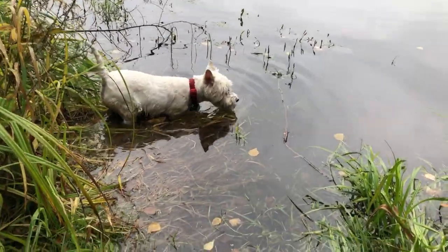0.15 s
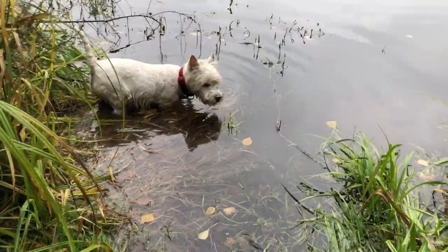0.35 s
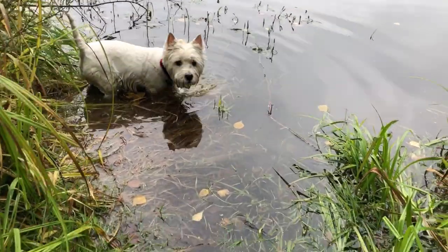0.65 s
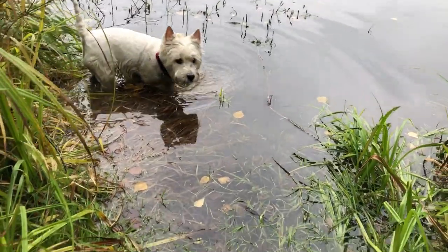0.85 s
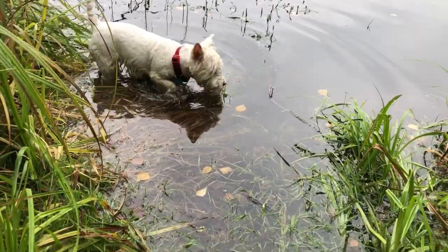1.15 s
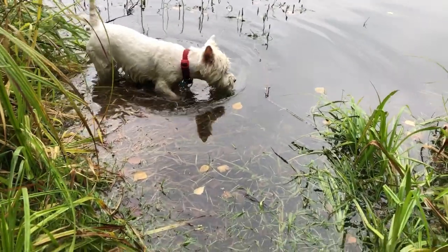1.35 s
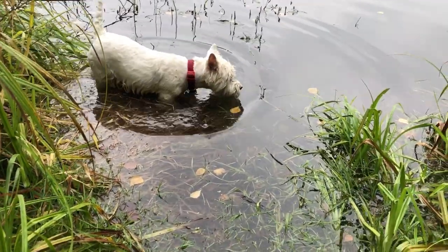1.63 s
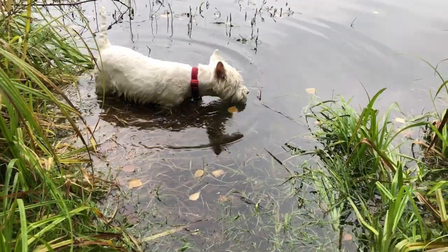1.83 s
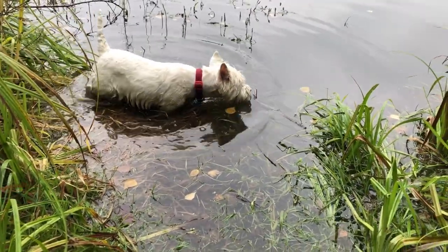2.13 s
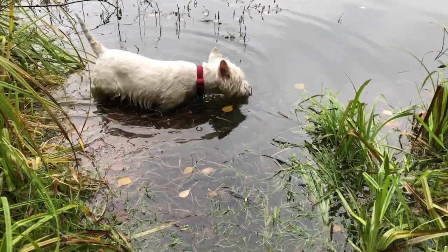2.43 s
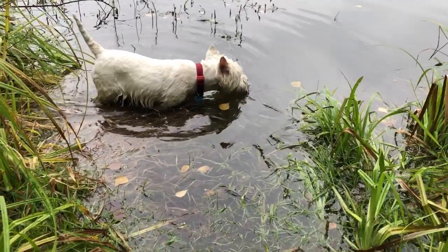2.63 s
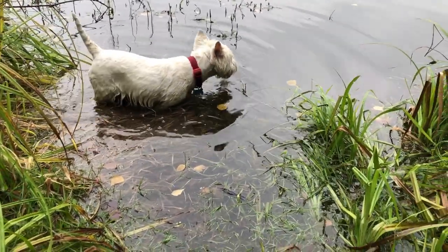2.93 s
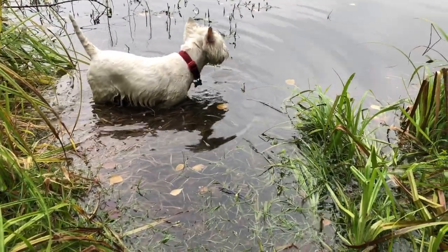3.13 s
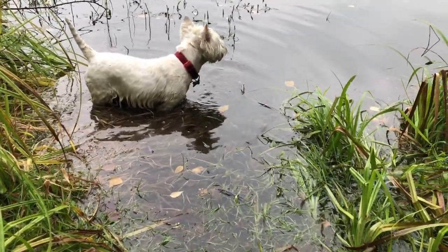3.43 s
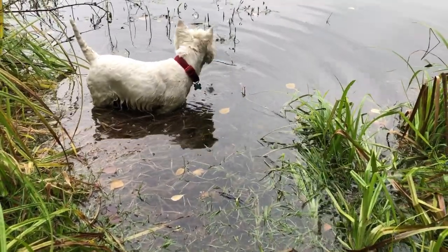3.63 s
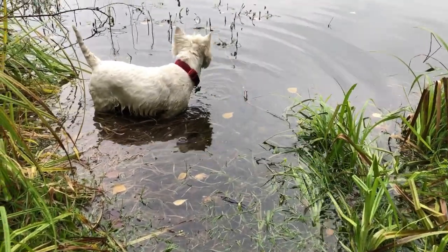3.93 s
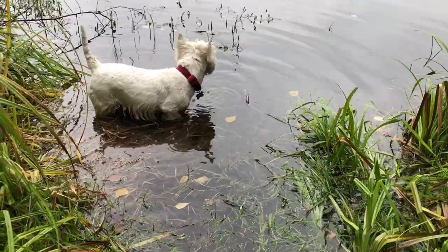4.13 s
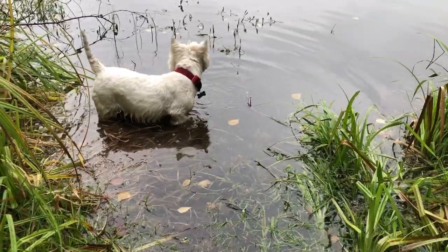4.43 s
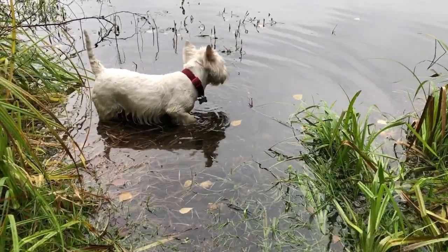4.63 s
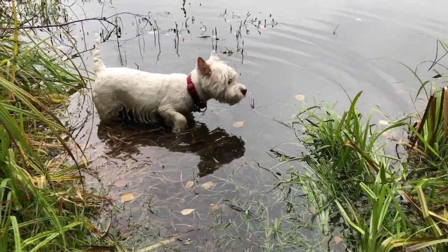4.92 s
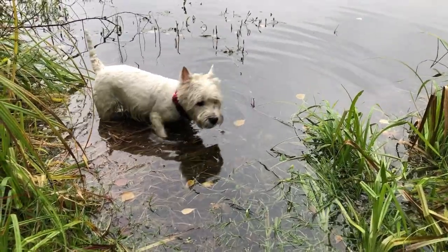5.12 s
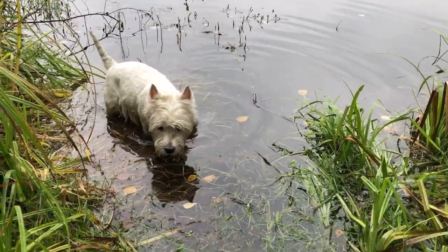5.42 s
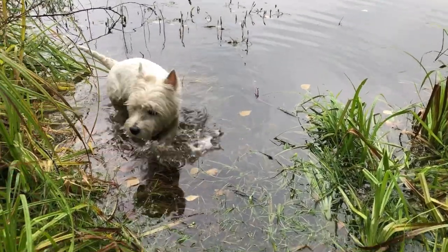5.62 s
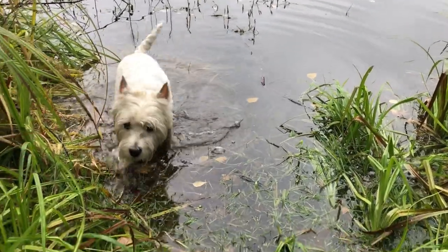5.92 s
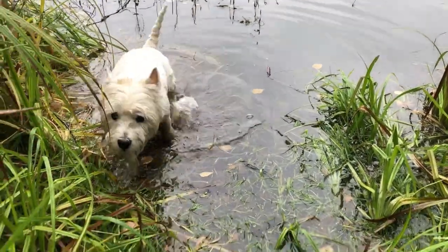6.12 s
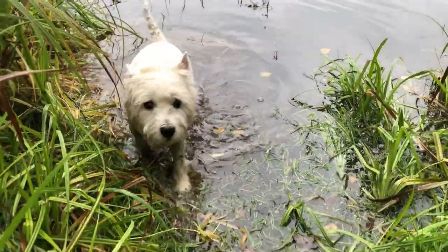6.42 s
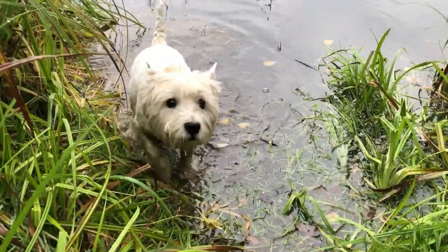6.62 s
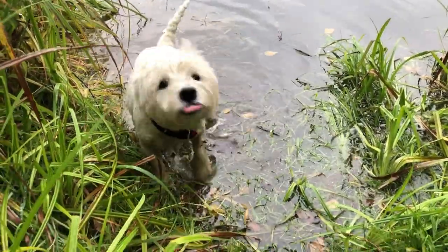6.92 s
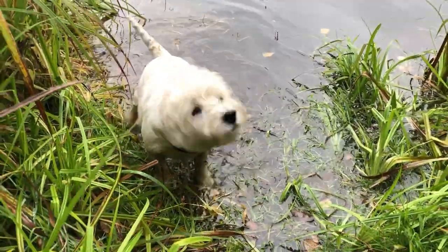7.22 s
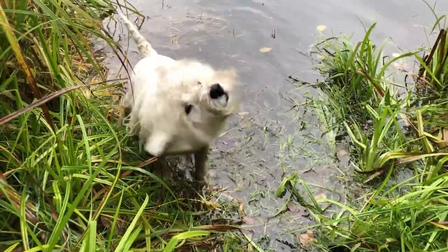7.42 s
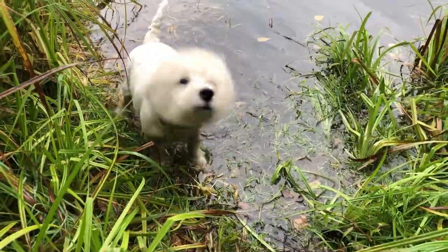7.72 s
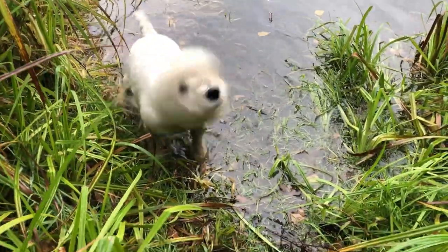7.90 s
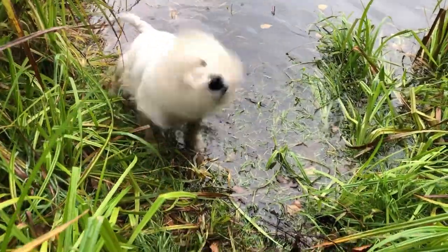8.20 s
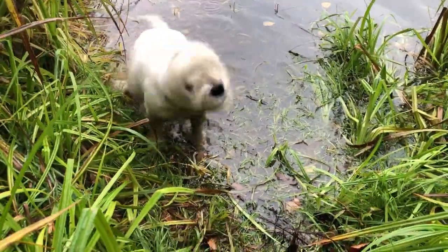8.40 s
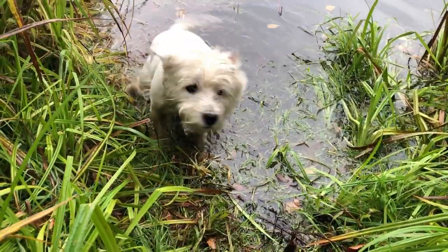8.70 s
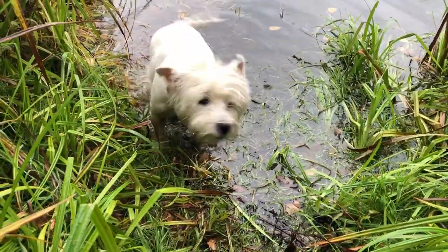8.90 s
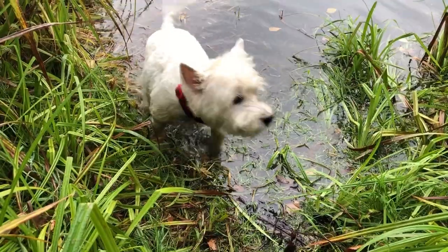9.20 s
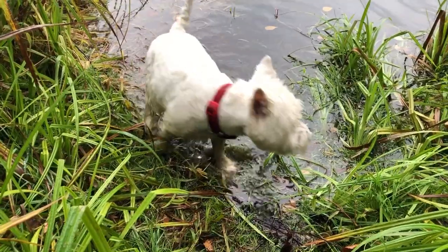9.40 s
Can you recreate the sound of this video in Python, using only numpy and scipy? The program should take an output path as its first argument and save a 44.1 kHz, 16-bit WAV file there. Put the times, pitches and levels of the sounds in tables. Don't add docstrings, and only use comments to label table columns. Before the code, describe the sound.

A small dog wades gently through shallow water with gulps and ticking drops, splashes to the bank, then shakes with jingling collar and pattering spray.

```python
import sys
import numpy as np
from scipy import signal
from scipy.fft import rfft, irfft, next_fast_len
from scipy.io import wavfile
from scipy.ndimage import uniform_filter1d, map_coordinates

SR = 44100
rng = np.random.default_rng(int(sys.argv[2]) if len(sys.argv) > 2 else 0)


def master_out(mix):
    frames = np.transpose(np.atleast_2d(mix))
    ceiling = np.clip(frames, -1, 1)
    pcm = np.round(ceiling * 32767).astype(np.int16)
    wavfile.write(sys.argv[1], SR, pcm)


def volts_from_decibels(level):
    exponent = np.asarray(level, float) / 20
    return 10 ** exponent


N = 421155

# (time [s], chatter level [dB])
SHAKE = [
    (7.101, -66),
    (7.9, -66),
    (8.5, -60),
    (9.15, -63),
]
# (pitch [Hz], time to fall 60 dB [s])
TAG_MODES = [(11865, 0.058), (10350, 0.093), (15300, 0.097)]


def unit(x):
    return x / np.sqrt(np.mean(x ** 2) + 1e-20)


def coloured(x, spectrum):
    size = next_fast_len(x.shape[-1] + 2048)
    hz, db = np.transpose(spectrum)
    gain = volts_from_decibels(np.interp(np.log(np.fft.rfftfreq(size, 1 / SR) + 1), np.log(hz), db))
    return irfft(rfft(x, size) * gain, size)[..., :x.shape[-1]]


def wobble(rate):
    points = rng.standard_normal(int(N * rate / SR) + 4)
    return map_coordinates(points, [np.arange(N) * rate / SR])


def placed(start_s, waves):
    at = np.round(start_s * SR).astype(int)[:, None] + np.arange(waves.shape[1])
    return np.bincount(at.ravel(), waves.ravel(), N + SR)[:N]


def chirps(start_s, db, hz, life, glide, size, rise=0.16):
    age = np.arange(size) / SR / life[:, None]
    swell = (1 - np.exp(-age / rise)) * np.exp(-1.6 * age) * (age < 3)
    pitch = hz[:, None] * np.exp(glide[:, None] * np.minimum(age, 1.25))
    tone = np.sin(2 * np.pi * np.cumsum(pitch, axis=1) / SR)
    return placed(start_s, volts_from_decibels(db)[:, None] * swell * tone)


def swarm(count, hz, spread, cycles, scatter_db, size):
    pitch = np.clip(hz * np.exp(spread * rng.standard_normal(count)), 200, 15500)
    db = scatter_db * np.minimum(rng.exponential(size=count), 4)
    start_s = rng.uniform(0, N / SR, count)
    glide = rng.normal(0.12, 0.161, count)
    return unit(chirps(start_s, db, pitch, cycles / pitch, glide, size))


def stirring():
    # (time [s], time to fall 20 dB [s], slosh level [dB], depth as gurgle over slosh [dB])
    strokes = [(0.01, 2.5, -68.5, -13), (1.13, .25, -65, 9.5), (1.24, 0, -69, 12), (1.68, 0.2, -57, 6.5),
               (1.8, 0.14, -69, 2), (2.13, 0.8, -75, -6), (2.45, 0.34, -66, 2), (2.71, 0.06, -58.5, 0.5),
               (3.01, 0.2, -72, 6), (3.2, 1.2, -73.5, -4), (3.55, 0.3, -70.5, -6), (3.67, .1, -75, -11),
               (4.12, 0.14, -63.5, -13), (4.83, 0.04, -68.5, -15), (5.22, 0.1, -63.5, -17),
               (5.52, .06, -52, 6.5), (5.62, .22, -48, 0), (5.74, .4, -51, -9), (5.98, 0.19, -50.5, -11),
               (6.15, .55, -57, 1.5), (6.31, .16, -58, -30), (6.38, 0.19, -48.5, -19),
               (6.57, 0.05, -48.5, -10), (6.68, 0.2, -59, -29), (6.82, 0.32, -59, -16),
               (6.96, 0.1, -53, -12)]
    # (time [s], time to fall 20 dB [s], slosh level [dB], depth as gurgle over slosh [dB])
    flings = [(7.24, 0.55, -64.5, -24), (7.7, 0.73, -60.5, -7.5), (7.89, 0.63, -53, -7.5),
              (8.27, 0.56, -55, -7.5), (8.5, 0.75, -54.5, -9), (8.68, .2, -54, 7), (8.8, .12, -48.5, -5),
              (9.04, 0.41, -54, -8), (9.23, 0.13, -55, -10), (9.33, 0.18, -60, -12), (9.54, 0.44, -59, -19)]
    # gurgle, slosh and spray levels [dB]
    ripple_db = (-79, -81.5, -78)
    rise_share = 0.48
    leg_spray_db, coat_spray_db = -1.5, 3.5
    depth_dulls = 0.23
    t = np.arange(0, N, 64) / SR
    power = volts_from_decibels(2 * np.array(ripple_db))[:, None] + 0 * t
    for rows, spray_db in ((strokes, leg_spray_db), (flings, coat_spray_db)):
        for s, fall_s, db, depth_db in rows:
            if_falling, if_rising = t - s, (s - t) / rise_share
            with np.errstate(all="ignore"):
                level_db = db - 20 * np.maximum(if_falling, if_rising) / fall_s
            offsets_db = np.array([[depth_db], [0], [spray_db - depth_dulls * depth_db]])
            power = power + volts_from_decibels(2 * (level_db + offsets_db))
    return [np.interp(np.arange(N) / SR, t, 10 * np.log10(p)) for p in power]


def wash():
    # (frequency [Hz], density [dB per Hz])
    spray_colour = [(2500, -26), (4500, -10), (8000, -20), (12000, -7.5), (16000, -2)]
    gurgle_db, slosh_db, spray_db = stirring()
    surge = wobble(35)
    gurgle = swarm(count=3000, hz=848, spread=0.374, cycles=3.6, scatter_db=1.8, size=1024)
    fizz = swarm(count=9000, hz=2603, spread=0.457, cycles=4.4, scatter_db=3.3, size=256)
    blips = swarm(count=1500, hz=2400, spread=0.5, cycles=10.35, scatter_db=3.5, size=768)
    slosh = volts_from_decibels(2 * surge) * fizz + volts_from_decibels(-3.5) * blips

    crackles = np.minimum(rng.exponential(size=N), 3) * (rng.random(N) < 0.003)
    clumps_db = 8.5 * crackles + 0.83 * surge + 2.8 * wobble(90)
    spray = unit(coloured(rng.standard_normal(N) * volts_from_decibels(clumps_db), spray_colour))
    mist = coloured(spray, [(9000, -26), (13000, -1.5)])
    before_shake = np.arange(N) / SR < SHAKE[0][0]
    spray = spray - 0.41 * mist * before_shake
    fine = swarm(count=20000, hz=7800, spread=0.485, cycles=5.8, scatter_db=1.5, size=128)
    spray = spray + volts_from_decibels(-3.5 + 1.5 * surge) * fine

    fur_drips = swarm(count=600, hz=12500, spread=0.25, cycles=3.9, scatter_db=3.5, size=160)
    water = volts_from_decibels(gurgle_db + 1.5) * gurgle + volts_from_decibels(slosh_db - 2.3) * slosh
    return water + volts_from_decibels(spray_db - 1.3) * spray + volts_from_decibels(-80) * fur_drips


def pockets(start_s, db, hz, life_s, glide):
    return chirps(start_s, db + 8, hz, 0.78 * life_s, 0.72 * glide, size=4096)


def gulps():
    # (time [s], peak level [dB], start pitch [Hz], life [s], pitch glide [log ratio])
    gulp_rows = [(0.618, -55, 1470, .013, 0), (1.071, -51.5, 1510, .016, -0.054),
                 (1.109, -46.5, 764, .018, -.1), (1.13, -54, 810, .009, -.28), (1.15, -49, 1030, .011, 0.1),
                 (1.171, -43.5, 1003, 0.015, 0), (1.29, -50.5, 1590, .019, .16),
                 (3.541, -53, 1620, .011, .17), (5.511, -43, 805, 0.0096, .4),
                 (5.513, -37.5, 661, .017, -.71), (5.55, -46, 633, 0.039, -0.13),
                 (5.603, -43, 1068, 0.027, 0.39), (5.649, -40, 377, 0.026, -0.01),
                 (9.443, -47, 1150, 0.0074, -0.12), (6.162, -42, 1070, 0.0095, -0.57),
                 (6.573, -50, 1910, 0.017, 0), (8.566, -48, 2200, 0.016, 0.084),
                 (8.652, -22.5, 594, .012, -.05), (8.677, -36, 763, .012, -0.14),
                 (8.708, -38, 676, .012, -0.32), (8.731, -43.5, 1110, .009, .19),
                 (8.735, -39.5, 630, 0.012, -0.035), (8.765, -36, 332, 0.016, 0.97)]
    return pockets(*np.transpose(gulp_rows))


def plops():
    # (time [s], peak level [dB], start pitch [Hz], pitch glide [log ratio])
    plop_rows = [(1.208, -41, 1750, .17), (1.668, -48, 605, 0.098), (1.705, -41, 650, -0.16),
                 (1.73, -46, 1200, -.07), (1.789, -49.5, 2090, 0), (1.929, -46, 2010, -0.011),
                 (2.445, -48, 1070, -.14), (2.696, -44.5, 596, 0.12), (3.005, -49, 900, -0.59),
                 (4.099, -43, 1020, -0.056), (5.262, -45, 2050, -0.15), (5.55, -35, 1520, 0.099),
                 (5.607, -36.5, 880, -.19), (5.842, -42, 3210, -0.02), (6.124, -40.5, 1490, 0.77),
                 (6.25, -30, 558, -.72), (6.257, -35, 1150, -0.23), (6.305, -43, 3100, .31),
                 (6.788, -44.5, 2120, .06), (6.9495, -30, 2060, -0.08), (7.287, -49.5, 1820, .17),
                 (8.28, -38.5, 2030, .05), (8.373, -39, 1200, 0.018), (8.578, -30.5, 1036, -0.2),
                 (8.59, -32.5, 2350, 0), (8.629, -36.5, 1330, -0.17), (8.802, -43.5, 1800, 0.37),
                 (9.037, -45, 520, 0.066), (9.127, -43.5, 776, -0.42), (9.318, -24.5, 3860, 0.0067)]
    s, db, hz, glide = np.transpose(plop_rows)
    life_s = 0.0057 * (1000 / hz) ** 0.37
    return pockets(s, db, hz, life_s, glide)


def drips():
    # (time [s], peak level [dB], start pitch [Hz], pitch glide [log ratio])
    drip_rows = [(.698, -64.5, 1700, .38), (3.165, -56, 1130, .05), (3.294, -57, 1500, 1.27),
                 (3.913, -66, 2350, 0.097), (3.225, -68, 2300, .4), (5.22, -64, 2400, -0.3),
                 (6.05, -56, 890, .3), (6.082, -49.5, 1010, 0.13), (6.185, -50, 1050, 0.38),
                 (6.212, -49, 740, .08), (6.964, -45.5, 640, -.26), (7.02, -52, 1490, .2),
                 (7.133, -54.5, 2130, 0.49)]
    s, db, hz, glide = np.transpose(drip_rows)
    return pockets(s, db, hz, 0.017 + 0 * s, glide)


def splats():
    # (time [s], peak level [dB], centre [Hz])
    tick_rows = [(0.8949, -52, 3100), (1.069, -39, 1500), (1.136, -45.5, 6690), (1.642, -50, 2830),
                 (1.663, -42, 2050), (1.8, -42, 3100), (2.445, -50, 6170), (2.4652, -45, 2540),
                 (2.693, -37.5, 1600), (2.821, -47, 1450), (3.0052, -46, 3320), (3.6546, -50, 5160),
                 (4.0682, -45, 3370), (4.575, -50.5, 8300), (5.142, -39, 1040), (5.2013, -46, 5300),
                 (5.2606, -34, 1900), (5.2718, -32.5, 3800)]
    # (time [s], peak level [dB], centre [Hz], hiss level [dB])
    trot_rows = [ (5.5102, -32.5, 1490, -67), (5.55, -41, 1610, -54), (5.6425, -37, 1540, -40.5),
                 (5.707, -38, 5420, -67), (5.7235, -30, 4770, -52), (5.742, -31.5, 1810, -45.5),
                 (5.922, -39, 4070, -47.5), (5.9763, -34, 2350, -41.5), (6.0034, -34, 5060, -65),
                 (6.0712, -34.5, 1770, -59), (6.248, -31, 1480, -49), (6.3024, -40, 3640, -56),
                 (6.327, -43, 3160, -50), (6.3635, -34, 1660, -49), (6.3782, -24.5, 2430, -40.5),
                 (6.5448, -51, 1970, -47), (6.6686, -50, 8510, -48.5), (6.683, -36.5, 5630, -50),
                 (6.787, -53, 2010, -49.5), (6.8513, -43, 6210, -52), (6.9498, -20.5, 1540, -77),
                 (6.986, -37, 2560, -47)]
    # (time [s], peak level [dB], centre [Hz], hiss level [dB])
    shaken_rows = [(7.227, -34.5, 5500, -68.5), (7.369, -41.5, 6400, -63), (7.454, -41, 1990, -55),
                   (7.6074, -44, 6430, -51), (7.6779, -44, 2030, -60), (7.8613, -57, 3780, -49),
                   (8.039, -33.5, 7460, -42), (8.098, -32.5, 2260, -52), (8.1356, -34, 5900, -46),
                   (8.2496, -38, 7000, -39.5), (8.28, -28.5, 5170, -45), (8.3154, -34.5, 3760, -46),
                   (8.336, -42, 2210, -57), (8.3658, -28.5, 2310, -48), (8.4411, -22, 5600, -44),
                   (8.5465, -40, 2240, -49), (8.5894, -25, 2380, -40), (8.6285, -30, 2860, -51),
                   (8.6479, -26, 1720, -43.5), (8.741, -36, 7930, -45), (8.789, -33, 1940, -46),
                   (8.9043, -33.5, 2100, -54), (8.9477, -24, 4100, -44), (9.004, -37, 2010, -49),
                   (9.015, -34.5, 6300, -48), (9.0484, -35, 2640, -51), (9.098, -30.5, 7100, -43),
                   (9.2065, -40.5, 3420, -50), (9.3177, -22.5, 4000, -36), (9.44, -37.5, 4360, -53)]
    # (frequency [Hz], density [dB per Hz])
    hiss_colour = [(4000, -11), (7500, 3), (11000, 1.5), (16000, 7)]
    ticks = np.array(tick_rows)
    ticks = np.column_stack([ticks, ticks[:, 1] - 30])
    s, db, hz, hiss_db = np.vstack([ticks, trot_rows, shaken_rows]).T[:, :, None]
    t, f = np.arange(4096) / SR, np.fft.rfftfreq(4096, 1 / SR)

    def noise():
        return rng.standard_normal((len(s), len(t)))

    uneven = np.clip(unit(uniform_filter1d(noise(), size=60)), -2, 2)
    ragged = volts_from_decibels(3.9 * np.minimum(t / 0.0055, 1) * uneven)
    resonance = 0.9 * hz * f / np.abs(hz ** 2 - f ** 2 + 0.9j * hz * f)
    slap = irfft(rfft(noise()) * resonance ** 2)
    slap = slap / slap.std(axis=1, keepdims=True)
    slap = volts_from_decibels(db - 9.5) * (1 - np.exp(-t / 0.00052)) * slap
    hiss = unit(coloured(noise(), hiss_colour))
    hiss = volts_from_decibels(hiss_db + 11) * (1 - np.exp(-(t / 0.0014) ** 2)) * hiss
    pop = (1 - np.exp(-t / 0.00038)) * volts_from_decibels(-60 * t / 0.0086) * np.sin(2 * np.pi * hz * t)
    life_s = 0.02 * volts_from_decibels(0.047 * (np.maximum(db, hiss_db + 22) + 27))
    age = t / life_s
    fall = volts_from_decibels(-60 * age) + volts_from_decibels(-16 - 15 * age)
    return placed(s[:, 0], volts_from_decibels(db) * pop + fall * ragged * (slap + hiss))


def droplets():
    # (time [s], peak level [dB], pitch [Hz])
    wade_drops = [(0.6943, -51.2, 3140), (0.8945, -46.9, 2890), (0.8952, -47.8, 7940),
                  (1.0694, -50.0, 4300), (1.1028, -43.1, 3060), (1.118, -46.5, 5450), (1.2472, -44.0, 1400),
                  (1.6427, -44.7, 2730), (1.655, -47.8, 2560), (1.6666, -46.0, 5540), (1.7885, -41.9, 2890),
                  (1.7987, -45.5, 990), (2.4582, -44.2, 5790), (2.4648, -41.8, 3960), (2.7035, -44.7, 3140),
                  (2.7093, -45.3, 3060), (2.7347, -50.0, 3960), (2.7608, -50.3, 3140),
                  (2.8123, -45.2, 10090), (2.9111, -49.2, 1650), (3.022, -50.3, 3800),
                  (3.2209, -53.4, 2650), (3.3072, -44.3, 3230), (3.3435, -49.4, 2560),
                  (3.3682, -50.0, 3310), (3.5271, -52.9, 3060), (3.5271, -44.3, 9510),
                  (3.5764, -45.1, 7780), (3.6562, -52.7, 3480), (3.6867, -52.2, 4460),
                  (4.0728, -47.1, 3140), (4.0815, -44.4, 5380), (4.0981, -48.3, 3310),
                  (4.5763, -42.4, 7940), (4.7149, -51.5, 6290), (4.8492, -51.6, 3640),
                  (5.1416, -48.4, 3310), (5.2018, -38.2, 13230), (5.2025, -45.8, 5880),
                  (5.2127, -42.9, 5040), (5.2192, -46.4, 7530), (5.2316, -42.8, 8190),
                  (5.2439, -40.8, 13560), (5.2606, -33.8, 1900), (5.2723, -39.2, 1400),
                  (5.2773, -38.1, 8100), (5.278, -38.6, 3230), (5.3071, -52.6, 1990)]
    # (time [s], peak level [dB], pitch [Hz])
    trot_drops = [(5.474, -41.1, 750), (5.5008, -40.2, 1160), (5.5095, -39.3, 5380), (5.5574, -32.6, 580),
                  (5.5952, -32.6, 750), (5.6024, -38.8, 2650), (5.6285, -34.8, 660), (5.6307, -34.4, 3230),
                  (5.6343, -34.4, 580), (5.6438, -33.6, 2730), (5.6459, -20.8, 11000),
                  (5.6742, -34.7, 5700), (5.725, -29.9, 6120), (5.7279, -35.5, 830), (5.7373, -35.8, 3390),
                  (5.7431, -30.0, 5040), (5.7526, -32.1, 2980), (5.7794, -34.6, 6530),
                  (5.7809, -33.4, 2730), (5.7903, -37.1, 4300), (5.8215, -35.7, 6450),
                  (5.8759, -36.3, 4800), (5.9166, -38.2, 4390), (5.9318, -33.8, 3960),
                  (5.9413, -41.1, 1570), (5.9565, -38.2, 2980), (5.9811, -32.0, 5540),
                  (6.0044, -40.6, 1160), (6.0697, -37.2, 3140), (6.0842, -40.1, 2400),
                  (6.0987, -40.1, 1160), (6.1582, -40.1, 3060), (6.2235, -40.8, 2150), (6.233, -37.8, 3060),
                  (6.2895, -37.4, 3310), (6.3048, -34.6, 4630), (6.3301, -26.2, 12820),
                  (6.3643, -34.3, 3060), (6.3701, -34.9, 4880), (6.3781, -28.6, 6290),
                  (6.3868, -34.6, 1400), (6.3868, -31.7, 7110), (6.3984, -39.4, 2310),
                  (6.4137, -38.1, 1160), (6.4194, -38.7, 3480), (6.4223, -39.5, 1570),
                  (6.4281, -35.8, 5790), (6.5305, -40.7, 2730), (6.553, -39.5, 1990), (6.5725, -34.6, 1810),
                  (6.6306, -35.0, 4300), (6.6697, -29.5, 13800), (6.6828, -29.9, 5540),
                  (6.7249, -37.0, 2400), (6.7786, -43.3, 1570), (6.7909, -30.9, 8760),
                  (6.9259, -40.7, 1900), (6.9658, -35.9, 4460), (6.976, -40.2, 3480), (6.9847, -38.1, 4140)]
    # (time [s], peak level [dB], pitch [Hz])
    shake_drops = [(7.1995, -34.5, 3720), (7.4563, -33.5, 5450), (7.4868, -37.1, 3550),
                   (7.608, -37.9, 6200), (7.6791, -34.0, 5450), (7.8946, -40.9, 1740),
                   (7.9614, -41.5, 2060), (8.0282, -39.0, 2310), (8.0383, -38.0, 2980),
                   (8.0478, -41.5, 1320), (8.0985, -35.1, 5290), (8.0985, -32.6, 2150),
                   (8.195, -41.1, 2240), (8.2088, -39.1, 2150), (8.2291, -32.1, 8020), (8.248, -40.4, 990),
                   (8.3561, -30.5, 3720), (8.367, -29.6, 5210), (8.3975, -38.3, 1900),
                   (8.4418, -31.4, 2980), (8.4577, -38.0, 3550), (8.4722, -34.2, 1740),
                   (8.5013, -38.2, 2240), (8.5803, -37.5, 3390), (8.5898, -24.3, 5700),
                   (8.597, -25.6, 8190), (8.6282, -29.5, 2650), (8.6493, -33.0, 6120),
                   (8.6877, -39.1, 2810), (8.6899, -30.8, 500), (8.7436, -33.3, 6360), (8.745, -34.5, 580),
                   (8.753, -37.7, 3230), (8.79, -34.4, 5790), (8.7958, -34.5, 4210), (8.806, -32.0, 3640),
                   (8.8089, -35.6, 750), (8.8177, -37.1, 830), (8.8183, -35.3, 4550), (8.9185, -37.6, 1650),
                   (8.9279, -41.1, 2060), (8.9475, -35.5, 1240), (8.9526, -30.6, 7360),
                   (9.0041, -35.7, 1990), (9.0382, -33.1, 3800), (9.0491, -33.5, 3720),
                   (9.0593, -38.1, 2480), (9.0984, -28.6, 8020), (9.1456, -42.4, 1400),
                   (9.253, -37.3, 2560), (9.2624, -38.2, 2480), (9.3219, -24.8, 6360),
                   (9.3386, -40.1, 2240), (9.348, -38.4, 3230), (9.4395, -38.4, 3230)]
    s, db, hz = np.vstack([wade_drops, trot_drops, shake_drops]).T
    touch = chirps(s, db - 7, 10500 + 0 * s, 0.0003 + 0 * s, 0 * s, size=64)
    life_s = 0.005 * (1000 / hz) ** 0.7
    return touch + chirps(s, db - 0.7, hz, life_s, 0.08 + 0 * s, size=1024, rise=0.3)


def ear_flaps():
    k = np.arange(7)
    start_s = 7.995 + 0.0915 * k - 0.0013 * k ** 2
    flap_hz = 684 * np.exp(0.056 * rng.standard_normal(len(k)))
    flaps = pockets(start_s, -46.5 + 1.5 * k, flap_hz, 0.0041 + 0 * k, 0 * k - 0.06)
    thuds = pockets(start_s, -54.5 + 0 * k, 173 + 0 * k, 0.034 + 0 * k, 0 * k)
    return flaps + thuds


def jingle(hits, modes, stop_s):
    rows, t = np.array(hits), np.arange(4096) / SR
    levels = np.column_stack([rows[:, 1], rows[:, 1:2] + rows[:, 2:]])
    touch_s = stop_s * np.exp(0.2 * rng.standard_normal((len(rows), 1)))
    stopped = 1 / (1 + (t / touch_s) ** 8)
    ringing = np.zeros((len(rows), len(t)))
    for (hz, t60), db in zip(modes, levels.T):
        beating = volts_from_decibels(4.3 * unit(uniform_filter1d(rng.standard_normal(ringing.shape), size=200)))
        tune = 1 + 0.0018 * rng.standard_normal((len(rows), 1))
        fading = volts_from_decibels(db[:, None] - 60 * t / t60)
        ringing += beating * fading * np.sin(2 * np.pi * hz * tune * t)
    return placed(rows[:, 0], volts_from_decibels(1.5) * (1 - np.exp(-t / 0.0011)) * stopped * ringing)


def collar_tag():
    # (time [s], peak level [dB], second mode over first [dB], third mode over first [dB])
    tag_hits = [(3.6027, -80, 0, -13), (3.9045, -78, -1, -5), (7.227, -59, 12.5, 5), (7.61, -55, -3, -15),
                (8.039, -63, 5, 7), (8.2515, -30, -7, -7), (8.2664, -31, -12, -12), (8.279, -34, -8, -12),
                (8.3649, -50, -1, -2), (8.518, -51, -4, -2), (8.548, -35, -10, -10),
                (8.7429, -21.5, -20, -28), (9.0498, -52, -8, -20), (9.0982, -44, -22, -5)]
    return jingle(tag_hits, TAG_MODES, stop_s=0.023)


def tag_chatter(count=60):
    s, db = np.transpose(SHAKE)
    at = rng.uniform(s[0], s[-1], count)
    luck = rng.standard_normal((count, 3))
    tap_db = np.interp(at, s, db) + 4.5 * luck[:, 0]
    taps = np.column_stack([at, tap_db, 4 * luck[:, 1:] - 2])
    return jingle(taps, TAG_MODES, stop_s=0.03)


def collar_ring():
    # (time [s], peak level [dB], second mode over first [dB])
    ring_hits = [(7.0459, -66.5, 10), (7.0818, -55.5, -16), (7.109, -56, -18), (7.1781, -45, -24),
                 (7.2275, -50, -21), (7.4849, -50.5, -9), (7.672, -47.5, -24), (7.7707, -50.5, -13),
                 (7.8331, -51, -25), (7.86, -50, -12), (8.2227, -48, -12), (8.3554, -50.5, -22),
                 (8.5979, -43, -9)]
    # (pitch [Hz], time to fall 60 dB [s])
    ring_modes = [(3790, 0.075), (8450, 0.093)]
    free = jingle(ring_hits[:4], ring_modes, stop_s=0.036)
    return free + jingle(ring_hits[4:], ring_modes, stop_s=0.015)


def distance():
    # (frequency [Hz], density [dB per Hz])
    far_colour = [(20, -44), (40, -9), (65, 0.5), (134, -4), (250, -10.5), (500, -21), (1000, -22.5),
                  (1500, -30), (2200, -42), (4800, -43), (9000, -49), (16000, -46.5)]
    level_db = -53.5 + 0.5 * wobble(1.5)
    return volts_from_decibels(level_db) * unit(coloured(rng.standard_normal(N), far_colour))


def scene():
    water = wash() + gulps() + plops() + drips() + splats() + droplets()
    metal = collar_tag() + tag_chatter() + collar_ring()
    return (water + ear_flaps() + metal + distance())[None]


def low_pass(x):
    return signal.sosfilt(signal.butter(12, 16990, fs=SR, output="sos"), x)


def record(dry):
    top_hz = 15850
    limited = coloured(dry, [(20, 0), (top_hz, 0), (top_hz + 150, -28), (top_hz + 900, -45)])
    return low_pass(limited)


dry = scene()
out = record(dry)
master_out(out)
```